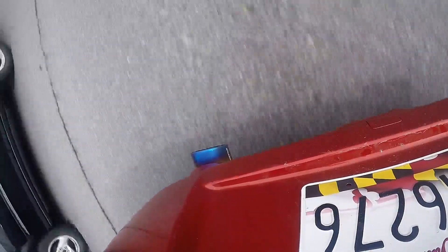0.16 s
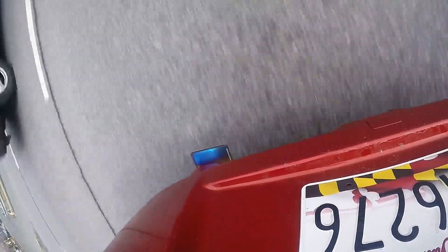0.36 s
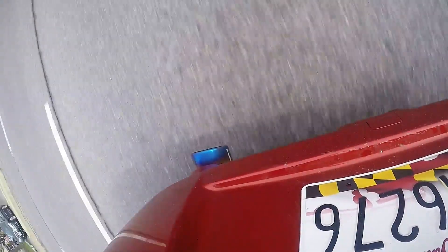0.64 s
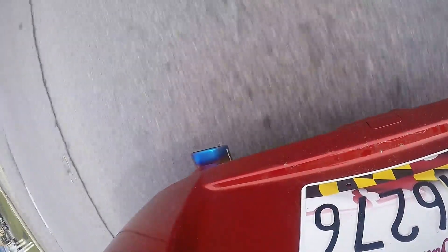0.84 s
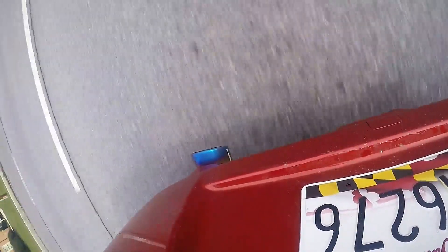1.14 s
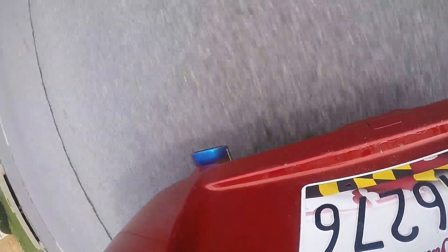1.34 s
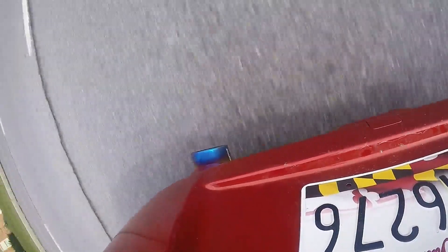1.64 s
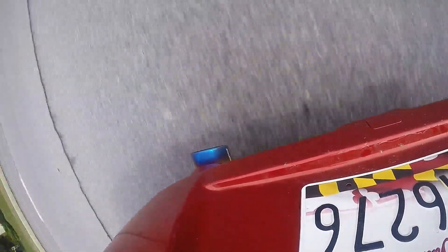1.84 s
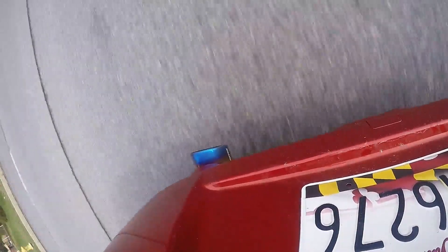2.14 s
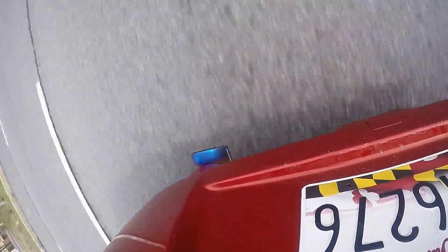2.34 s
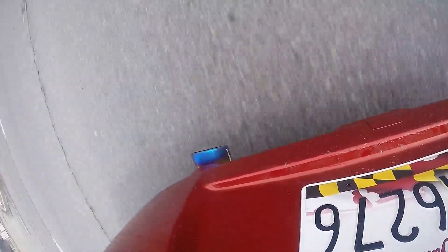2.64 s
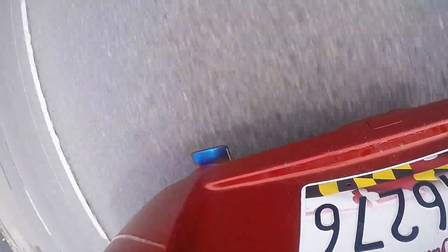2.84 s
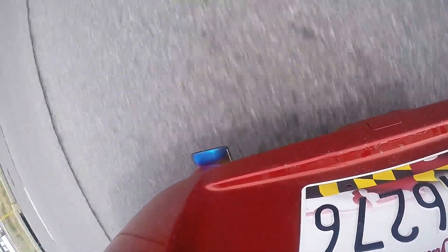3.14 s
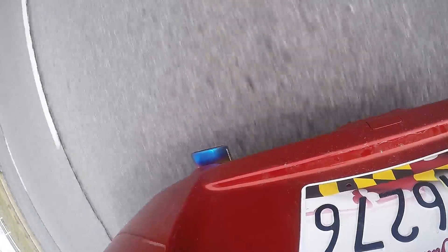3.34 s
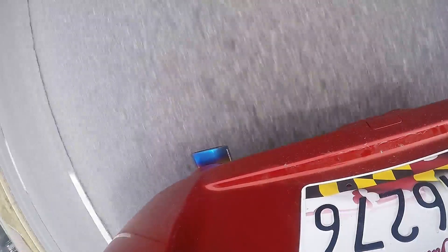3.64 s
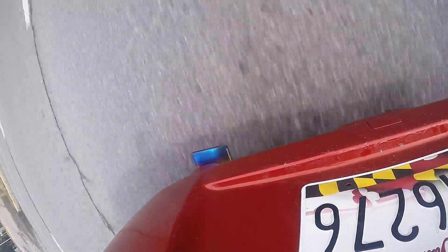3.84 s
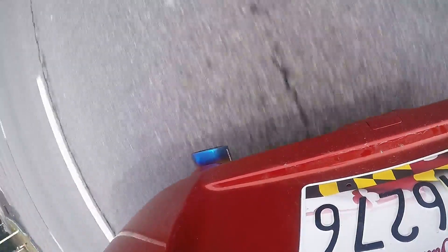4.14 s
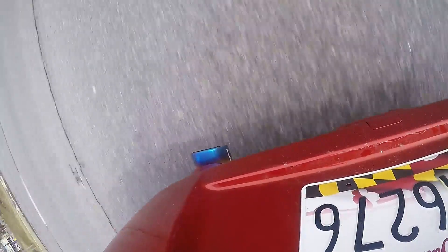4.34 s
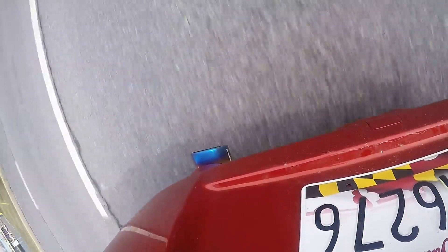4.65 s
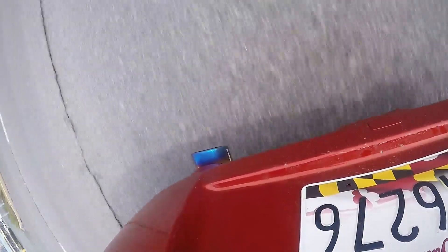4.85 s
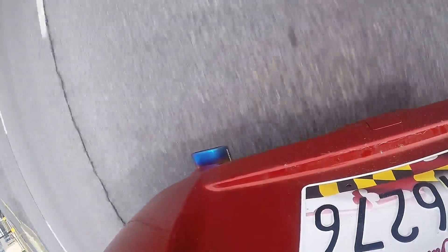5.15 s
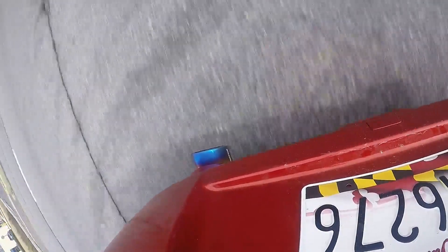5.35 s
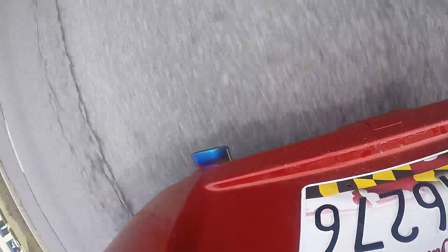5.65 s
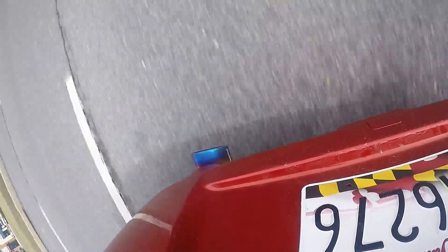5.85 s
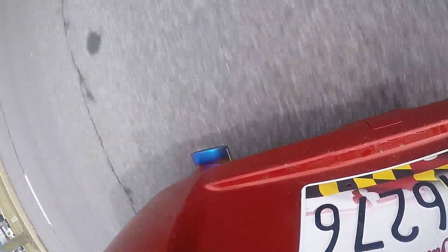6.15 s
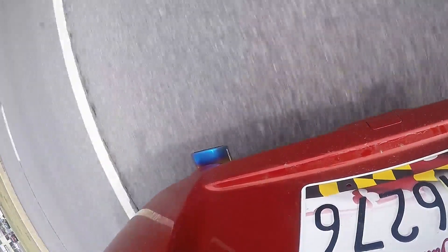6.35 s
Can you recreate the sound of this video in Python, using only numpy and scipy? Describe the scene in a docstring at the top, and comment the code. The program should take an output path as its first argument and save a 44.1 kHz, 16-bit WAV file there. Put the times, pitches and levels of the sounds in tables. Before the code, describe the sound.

Close beside a sports car's exhaust on the highway, the driver has just lifted: the loud note drops, burbles with a low thump, and coasts as an uneven hum, sinking slightly in pitch. Around halfway the throttle opens and a deep, full drone rises a little for two seconds, then drops and pops into coasting. Tyre hiss and lumpy wind buffet the small microphone; another car's hiss falls away early.

```python
"""On the rear bumper of a six-cylinder sports car at speed, close to the exhaust, with a small camera's microphone.
The driver has just lifted off, coasts, pulls for two seconds and lifts again. Exhaust pulses, one per firing, are
coloured by the pipe and turn uneven as the fuelling changes; short burbles, decaying tones mostly near 270 Hz and
one low thump, come around the fuel cuts, and a thin tone lingers. Shaped noise makes the tyre hiss, a car alongside
and the wind buffeting the microphone. The camera's gain control ducks everything while the engine pulls."""
import sys
import numpy as np
from scipy import signal
from scipy.fft import rfft, irfft, next_fast_len
from scipy.io import wavfile
from scipy.ndimage import uniform_filter1d, map_coordinates

SR = 44100
rng = np.random.default_rng(int(sys.argv[2]) if len(sys.argv) > 2 else 0)


def digitize_waveform(pressure):
    """Quantize a signal to 16-bit integers and store it at the path in sys.argv[1].

    Rows of a 2-D input are taken as channels; values are limited to [-1, 1].
    """
    field = np.atleast_2d(pressure).T
    bounded = np.clip(field, -1, 1)
    quanta = np.round(bounded * 32767).astype(np.int16)
    wavfile.write(sys.argv[1], SR, quanta)


def gain_from_decibels(decibels):
    """Convert decibel values to linear amplitude factors."""
    exponent = np.asarray(decibels, float) / 20
    return 10 ** exponent


N = 286209  # length in samples

# Engine speed. Each row: time in seconds, firings per second.
FIRING_RATE = [(0, 190.6), (.2, 190.4), (.8, 187.1), (3.2, 172.1), (3.35, 176.7), (3.6, 172.7),
               (4.0, 175.3), (5.0, 186.2), (5.3, 188), (5.6, 187.9), (6.49, 184.4)]
# Fuelled pulses, a cylinder per row in firing order, unequal manifold runs.
# Each row: relative size in dB, lateness in ms.
FUELLED_CYLINDERS = [(0, 0), (-1.2, -.17), (-.5, .23), (0, .32), (1.4, .28), (1.1, .08)]
# The same cylinders coasting. Each row: relative size in dB, lateness in ms.
COASTING_CYLINDERS = [(0, 0), (.9, -.32), (5.4, .53), (5.1, .27), (6.5, .18), (3.9, -.16)]
# Exhaust colour at full throttle. Each row: frequency in Hz, gain in dB.
PIPE_FULL_THROTTLE = [(12, -60), (50, -2), (90, 9), (140, 1), (183, 0), (365, -1), (460, -10), (560, -12),
                      (640, -13), (760, -17), (850, -26), (930, -24), (1100, -34), (1280, -52), (1400, -54),
                      (1500, -36), (1620, -52), (1950, -43), (2300, -80), (3000, -130)]
# Exhaust colour at part throttle. Each row: frequency in Hz, gain in dB.
PIPE_PART_THROTTLE = [(12, -62.5), (90, 0), (188, 1.5), (376, -6.5), (470, -8), (565, -23), (660, -31.5),
                      (755, -21.5), (850, -35.5), (1100, -51.5), (1600, -73.5), (2500, -100)]
# Exhaust colour while coasting. Each row: frequency in Hz, gain in dB.
PIPE_COASTING = [(12, -63.5), (90, -1), (150, 3.5), (180, -2), (215, -5), (270, 0), (375, -3.5),
                 (430, -23.5), (570, -17.5), (640, -26.5), (740, -24), (830, -41.5), (1000, -52.5),
                 (2500, -100)]
# High tones leave the muffler first. Each row: frequency in Hz, lead in ms.
MUFFLER_LEAD = [(150, -.35), (210, 0), (380, 0), (460, 1.5)]
# Tailpipe fizz. Each row: frequency in Hz, relative level in dB.
GAS_SPECTRUM = [(600, -28), (1500, -6.5), (2300, -21.5), (4000, -14.5), (5000, -3.5), (6000, -9.5),
                (9000, -32.5), (14000, -70.5)]
# The driver pulls. Each row: throttle opens in seconds, lifts in seconds, fade of the pulses after it in dB per second.
THROTTLE_PULLS = [(-2, -.03, 72), (3.425, 5.4, 62)]
# The fuel is cut. Each row: cut begins in seconds, fuel returns in seconds, coasting pulses in dB,
# dB added to that until the cut settles.
FUEL_CUTS = [(.56, 3.27, -14, -4), (5.975, 7, -12.5, 1)]
# Short burbles around the fuel cuts, one bank firing, heard as brief tones near 270 Hz, and one low thump.
# Each row: start in seconds, level in dB, tone in Hz, cycles to fade by a factor e.
BURBLES = [(.548, -8.5, 277, 5), (.573, -15, 277, 8.7), (.606, -10.5, 58.8, .8), (.627, -7, 258, 2.6),
           (5.95, -5, 239.5, 1.6), (6.033, -1.5, 274, 3), (6.046, -8, 298, 1.8)]
# Wind buffeting without the gusts. Each row: time in seconds, level in dB.
WIND_LEVEL = [(0, -10.5), (.6, -9), (1.0, -17), (3.3, -15), (3.8, -18), (5.0, -16.5), (5.7, -13.5),
              (6.49, -11.5)]
# Gusts swell, break and leave a lull. Each row: break in seconds, swell in dB, lull in dB.
WIND_GUSTS = [(.66, 0, 5.5), (1.15, 3.5, 3), (2.131, 5.5, 8), (3.11, 0.5, 8), (3.35, 6, 0), (4.4, 5.5, 2.5),
              (5.27, 2, 1), (5.881, 4, 2.5), (6.07, 6.5, 1.5)]
# Colour of the wind on the microphone. Each row: frequency in Hz, relative level in dB.
BUFFET_SPECTRUM = [(8, -20.5), (15, 0), (40, -4), (70, -9.5), (110, -18), (200, -20.5), (400, -24.5),
                   (800, -46), (2000, -88)]
# Tyre and air hiss through the camera housing. Each row: frequency in Hz, relative level in dB.
TYRE_SPECTRUM = [(100, 2), (400, 10.5), (800, -6), (946, -5.5), (1040, 1), (1130, -2.5), (1490, -6),
                 (1810, -4), (2030, -10.5), (2200, -7.5), (2660, -9), (3530, -22), (3980, -22), (4400, -28),
                 (5000, -30.5), (6500, -35), (7500, -44), (9500, -47), (12000, -55.5), (16000, -78)]
# A car in the next lane falls behind. Each row: time in seconds, hiss in dB.
PASSING_LEVEL = [(0, -44), (.3, -46.5), (.9, -51.5), (1.2, -90.5)]
# Colour of that car's hiss. Each row: frequency in Hz, relative level in dB.
PASSING_SPECTRUM = [(800, -16.5), (2500, 2), (4000, -7.5), (6000, -16), (9000, -27.5), (14000, -50.5)]

# full level; what is still missing after the quick opening, and the time constant of its building
FULL_DB, SHORT_DB, BUILD_S = -1.5, 10, .17
SNAP_S = .08  # the quick opening
BLOOM_S, DULL_S = .3, .11  # the note brightens after the throttle opens and dulls after the lift
IDLE_DB, EDGE_S = -28.5, .049  # uneven pulses left between pulling and coasting; how fast the cut takes hold
# first firings after the fuel returns: delay, level, fade
CATCH_S, CATCH_DB, CATCH_FADE_DB_PER_S = .06, -16, 108.5
# size scatter between firings; the extra when ragged, building before a cut and lasting after its start
CALM_DB, RAGGED_DB, STUMBLE_S, SETTLE_S = .38, 2.4, .3, .1
# extra size difference between cylinders (as a factor) at opening, its fading, and the extra at the lift
UNEVEN_OPEN, UNEVEN_FADE_S, UNEVEN_LIFT = 1.1, .19, .6
HUM_ORDER, HUM_DB, HUM_S = 4, -30.5, .22  # lingering tone: multiple of the firing rate, level, time to die
SWELL_S, LULL_S = .15, .13  # time constants of a gust's swell and lull


def exhaust():
    """Fuelled pulses brighten as the throttle opens; coasting pulses are more uneven between cylinders."""
    fuel, coast, scatter_db, uneven = fuelling()
    fuelled = fuel * firings(FUELLED_CYLINDERS, uneven, scatter_db, jitter_ms_per_db=.02)
    coasting = coast * firings(COASTING_CYLINDERS, np.ones(N), scatter_db, jitter_ms_per_db=.025)
    opening = sum(ramp(on, BLOOM_S) - ramp(off, DULL_S) for on, off, _ in THROTTLE_PULLS)
    tone = filtered(opening * fuelled, pipe(PIPE_FULL_THROTTLE))
    tone = tone + filtered((1 - opening) * fuelled, pipe(PIPE_PART_THROTTLE))
    tone = tone + filtered(coasting, pipe(PIPE_COASTING))
    return tone + tailpipe_gas(tone)


def tailpipe_gas(tone):
    """Turbulent gas swells with the strong cylinders of each cycle."""
    push = filtered(np.maximum(tone, 0) ** 2, lambda hz: 1 / (1 + 1j * hz / 70))
    return gain_from_decibels(-57) * push * rush(GAS_SPECTRUM, patchy_db=3.5)


def fuelling():
    """Gains of fuelled and coasting pulses, their scatter and the cylinders' unevenness, from the driver's foot."""
    t = np.arange(N) / SR
    fuelled, coasting, stumble, uneven = np.zeros(N), np.zeros(N), np.zeros(N), np.ones(N)
    for on, off, fade_db_per_s in THROTTLE_PULLS:
        pull_db = FULL_DB - SHORT_DB * fade(on, BUILD_S) - fade_db_per_s * np.maximum(t - off, 0)
        fuelled += ramp(on, SNAP_S) ** 2 * gain_from_decibels(pull_db)
    catch_fade_s = 20 / np.log(10) / CATCH_FADE_DB_PER_S
    for cut, end, db, first_db in FUEL_CUTS:
        fuelled += gain_from_decibels(CATCH_DB) * fade(end + CATCH_S, catch_fade_s)
        settled = ramp(cut + SETTLE_S, EDGE_S)
        taking_hold = ramp(cut - EDGE_S, EDGE_S) * (1 - ramp(end, EDGE_S))
        coasting += gain_from_decibels(db + first_db * (1 - settled)) * taking_hold
        # ragged around the start of the cut, and again once the fuel returns
        stumble += ramp(cut - STUMBLE_S, STUMBLE_S) - settled + ramp(end, EDGE_S)
    coasting = np.maximum(coasting, gain_from_decibels(IDLE_DB) * np.clip(1 - 6 * fuelled, 0, 1))
    stumble -= ramp(THROTTLE_PULLS[-1][0], SNAP_S)  # opening the throttle clears it
    for on, off, _ in THROTTLE_PULLS[1:]:
        uneven += UNEVEN_OPEN * fade(on, UNEVEN_FADE_S) + UNEVEN_LIFT * ramp(off - .15, .22)
    return fuelled, coasting, CALM_DB + RAGGED_DB * np.clip(stumble, 0, 1), uneven


def firings(cylinders, uneven, scatter_db, jitter_ms_per_db):
    """One impulse per firing, sized and delayed by its cylinder, a steady train having a firing tone of rms 1."""
    turns = 3.37 + np.cumsum(curve(FIRING_RATE)) / SR  # firings so far; the cycle is partway through at the start
    count = np.arange(4, int(turns[-1]))
    size_chance, time_chance = rng.standard_normal((2, len(count)))
    at = np.interp(count, turns, np.arange(N))
    nearest = at.astype(int)
    scatter_db = scatter_db[nearest]
    size_db, late_ms = np.array(cylinders)[count % 6].T
    size_db = size_db * uneven[nearest]
    late_ms = late_ms + jitter_ms_per_db * scatter_db * time_chance
    at = np.clip(at + late_ms * SR / 1000, 0, N - 2)
    size = gain_from_decibels(size_db + scatter_db * size_chance) / gain_from_decibels(size_db).mean()
    size = size * N / len(count) / np.sqrt(2)
    # an impulse between two samples is shared by both
    whole = at.astype(int)
    part = at - whole
    return np.bincount(whole, size * (1 - part), N) + np.bincount(whole + 1, size * part, N)


def pipe(colour):
    """Exhaust response: a colour, and a phase that adds up the lead of the high tones."""
    def response(hz):
        lead_cycles = np.cumsum(along(MUFFLER_LEAD, hz)) * hz[1] / 1000
        return gain_from_decibels(along(colour, hz)) * np.exp(2j * np.pi * lead_cycles)
    return response


def burbles():
    """Each burble is a tone that dies in a few cycles; the low thump dies within one."""
    out, t = np.zeros(N + SR), np.arange(SR // 10) / SR
    for start_s, db, hz, cycles in BURBLES:
        swell = (1 - np.exp(-t / .001)) * np.exp(-t * hz / cycles)
        out[round(start_s * SR):][:len(t)] += gain_from_decibels(db) * swell * np.sin(2 * np.pi * hz * t)
    return out[:N]


def hum():
    """The pipe keeps singing one overtone while the pulses fade after each lift."""
    turns = HUM_ORDER * np.cumsum(curve(FIRING_RATE)) / SR
    level = sum(ramp(off, DULL_S) * fade(off, HUM_S) for _, off, _ in THROTTLE_PULLS)
    return gain_from_decibels(HUM_DB + 1.3 * wobble(12)) * level * np.sin(2 * np.pi * turns)


def wind():
    """Eddies behind the car push the microphone in lumps."""
    t = np.arange(N) / SR
    gust_db = np.zeros(N)
    for break_s, swell_db, lull_db in WIND_GUSTS:
        gust_db += swell_db * (t < break_s) * np.exp(np.minimum(t - break_s, 0) / SWELL_S)
        gust_db -= lull_db * fade(break_s, LULL_S)
    level_db = curve(WIND_LEVEL) + uniform_filter1d(gust_db, size=2000)
    lumps = gain_from_decibels(1.5 * wobble(9) + 1.8 * wobble(22))
    return gain_from_decibels(level_db) * unit(lumps * rush(BUFFET_SPECTRUM, patchy_db=1))


def road():
    """Steady tyre hiss, a little patchy, and the brighter hiss of the car alongside."""
    own = gain_from_decibels(-27.5 + .54 * wobble(2.4)) * rush(TYRE_SPECTRUM, patchy_db=.8)
    return own + gain_from_decibels(curve(PASSING_LEVEL)) * rush(PASSING_SPECTRUM, patchy_db=2.5)


def rush(spectrum, patchy_db):
    """Coloured noise of rms 1 with patches of random gain in time and frequency."""
    cells = signal.stft(rng.standard_normal(N), nperseg=512)[2]
    field = uniform_filter1d(rng.standard_normal(cells.shape), size=5, axis=0)
    field = uniform_filter1d(field, size=10, axis=1)
    noise = signal.istft(cells * gain_from_decibels(patchy_db * unit(field)), nperseg=512)[1][:N]
    return unit(filtered(noise, lambda hz: gain_from_decibels(along(spectrum, hz))))


def filtered(x, response):
    """x times a complex response of frequency."""
    m = next_fast_len(N + 8192)
    return irfft(rfft(x, m) * response(np.fft.rfftfreq(m, 1 / SR)), m)[:N]


def along(points, hz):
    """(Hz, value) points read on a log axis."""
    f, v = np.transpose(points)
    return np.interp(np.log(hz + 1), np.log(f + 1), v)


def curve(rows):
    """(seconds, value) points read at every sample."""
    s, value = np.transpose(rows)
    return np.interp(np.arange(N) / SR, s, value)


def wobble(rate):
    """A smooth random curve, rate knots a second."""
    return map_coordinates(rng.standard_normal(N // 100), [np.arange(N) * rate / SR])


def ramp(start_s, length_s):
    """0 before the start, 1 after the length."""
    return np.clip((np.arange(N) / SR - start_s) / length_s, 0, 1)


def fade(start_s, time_s):
    """Jumps to 1 at the start and dies away exponentially."""
    since = np.arange(N) / SR - start_s
    return (since >= 0) * np.exp(-np.maximum(since, 0) / time_s)


def unit(x):
    """Scaled to rms 1."""
    return x / np.sqrt(np.mean(x ** 2) + 1e-20)


def scene():
    """Exhaust, burbles, lingering tone, wind and road at one microphone."""
    return (exhaust() + burbles() + hum() + wind() + road())[None]


def gain_control(x, threshold_db, squeeze, attack_s, release_db_per_s, start_db):
    """The camera turns down quickly above a threshold and creeps back up at a limited rate."""
    hop = 220
    sensed = filtered(x, lambda hz: hz > 120)  # the detector ignores the wind rumble
    power = uniform_filter1d(sensed ** 2, size=4000)[::hop]
    level_db = 10 * np.log10(abs(power) + 1e-10)
    wanted_db = -squeeze * np.maximum(level_db - threshold_db, 0)
    gain_db = [start_db]
    for wanted in wanted_db[1:]:
        gap = wanted - gain_db[-1]
        if gap < 0:
            step = gap * hop / SR / attack_s
        else:
            step = min(gap, release_db_per_s * hop / SR)
        gain_db.append(gain_db[-1] + step)
    return x * gain_from_decibels(np.interp(np.arange(N), np.arange(len(gain_db)) * hop, gain_db))


def low_pass(x):
    """Removes everything above the highest recorded frequency."""
    return signal.sosfilt(signal.butter(12, 15700, fs=SR, output="sos"), x)


def record(dry):
    """The camera's gain control, a soft ceiling and a soft start."""
    x = gain_control(dry[0], threshold_db=-11.5, squeeze=.9, attack_s=.047, release_db_per_s=8, start_db=-10)
    x = x / (1 + abs(x / .97) ** 8) ** (1 / 8)
    x = x * np.minimum(np.arange(N) / 200, 1)
    return low_pass(x[None])


dry = scene()
out = record(dry)
digitize_waveform(out)
```